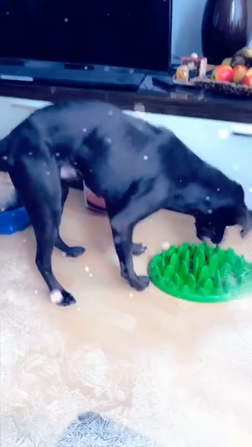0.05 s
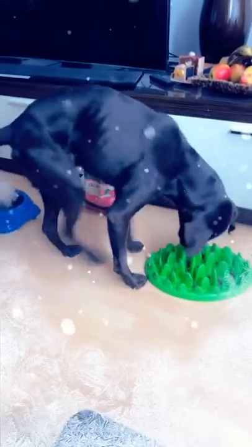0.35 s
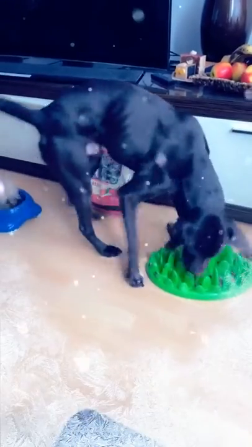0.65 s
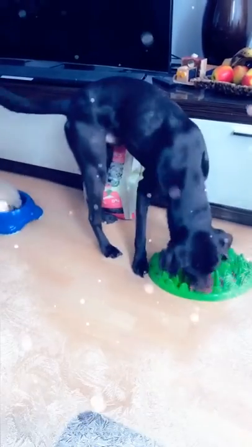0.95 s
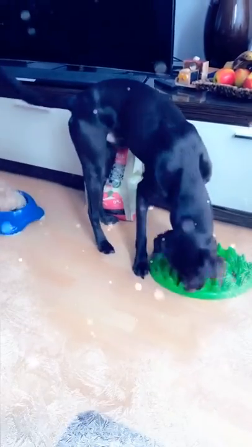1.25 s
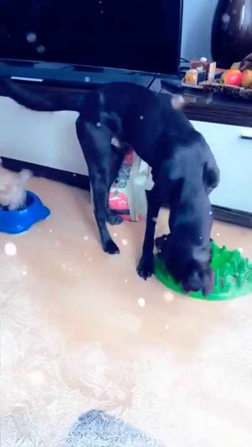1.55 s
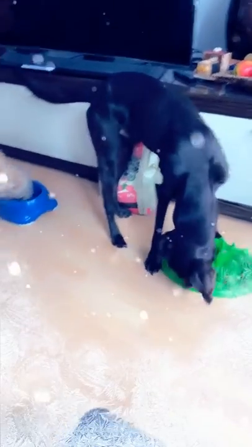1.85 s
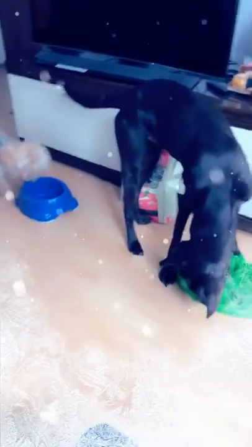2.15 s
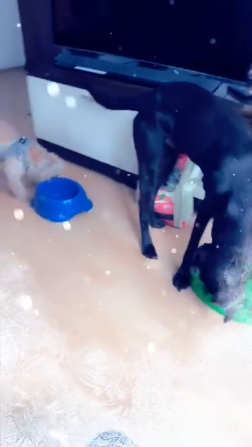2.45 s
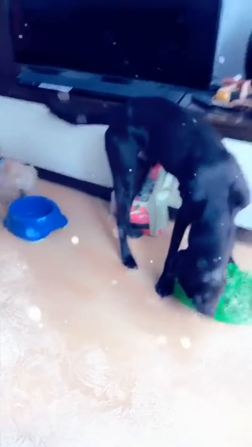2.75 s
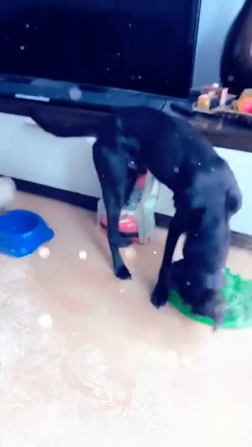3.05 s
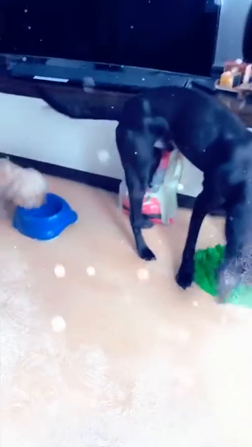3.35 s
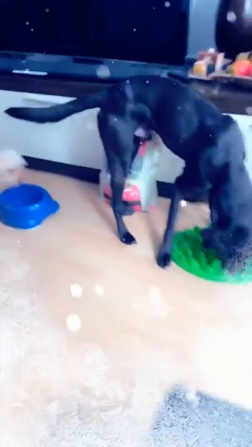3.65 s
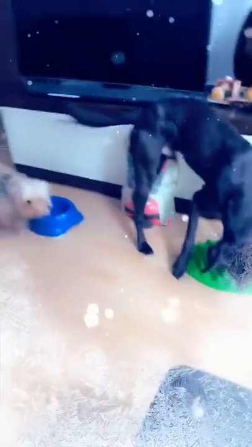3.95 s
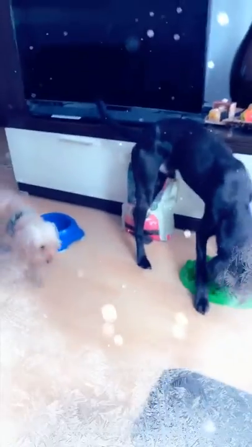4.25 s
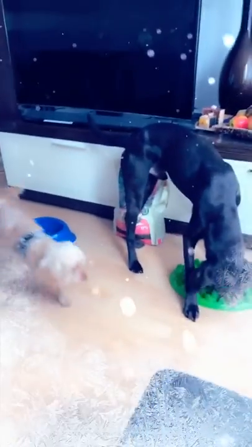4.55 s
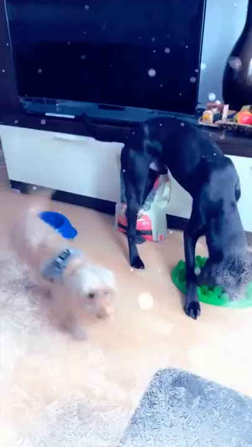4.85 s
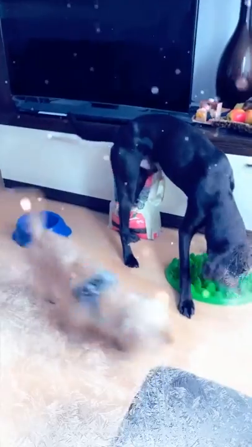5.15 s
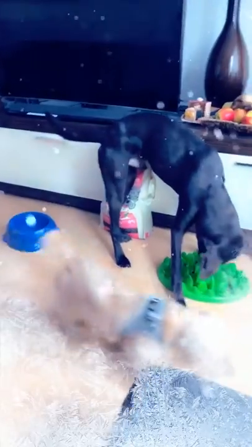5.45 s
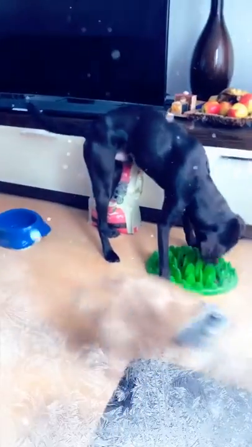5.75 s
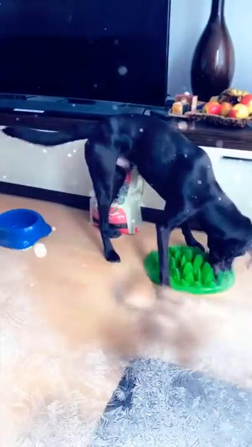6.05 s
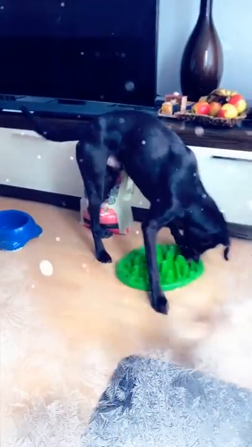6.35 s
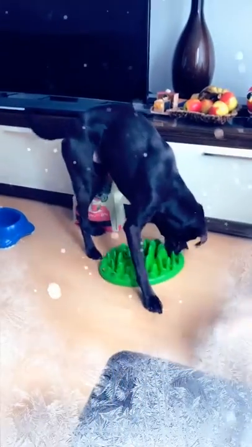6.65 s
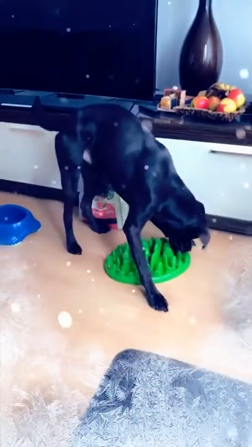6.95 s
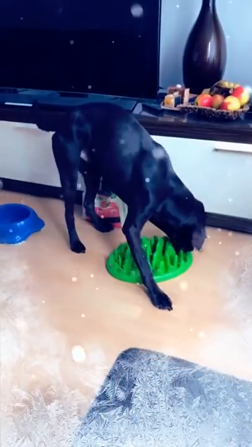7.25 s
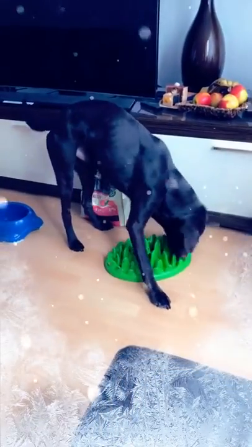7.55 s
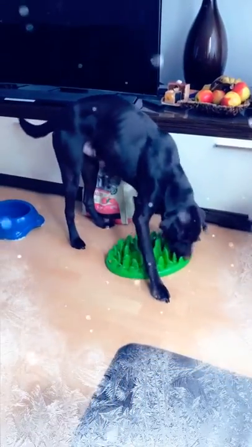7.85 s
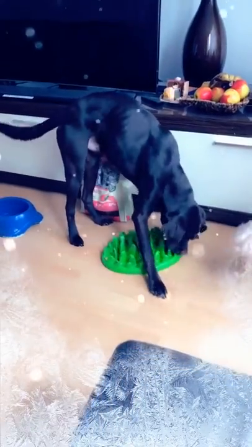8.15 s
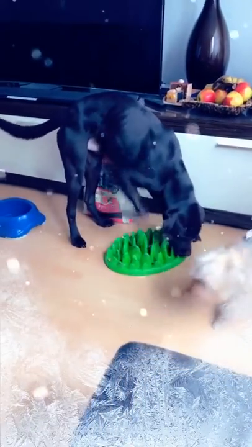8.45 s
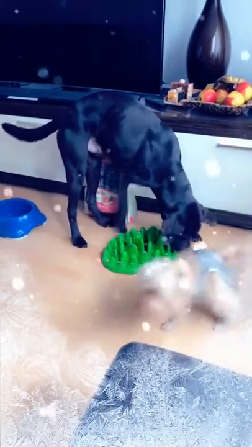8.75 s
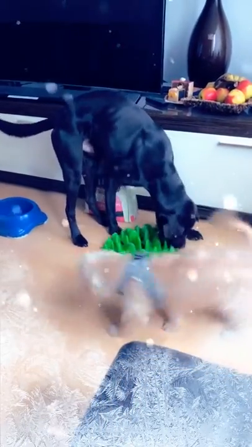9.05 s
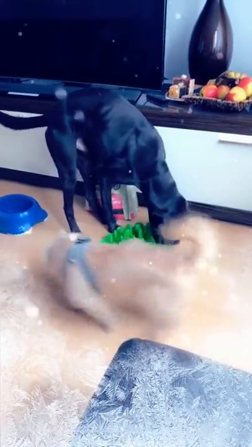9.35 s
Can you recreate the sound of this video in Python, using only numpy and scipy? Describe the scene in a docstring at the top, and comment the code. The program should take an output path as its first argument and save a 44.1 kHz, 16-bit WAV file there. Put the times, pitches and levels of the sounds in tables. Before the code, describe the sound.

Crisp crunches open as a dog chews kibble, followed by a quick, uneven chatter of snout and pellets against a plastic feeder bowl. Sparser knocks and cracks give way to a quieter moment of licking and soft paw bumps, before the clatter comes back louder and ends on a crunch. The microphone is in the same slightly echoing room, catching faint coat rustle and low floor rumble.

```python
"""A dog roots for kibble in a spiked plastic slow-feeder bowl on the floor of a hard, ringing room.
Pellets crack between its teeth first; from 1 to 3 s snout and pellets chatter on the spikes.
Sparser knocks and cracks follow, then a lull of wet smacks and soft bumps from 5 to 6 s.
The knocks return, peak near 7.3 s and stay busy until a last crack at 9.6 s.
Throughout, crumbs shuffle, the coat rustles and the floor booms softly under the dog's weight."""
import sys
import numpy as np
from scipy import signal
from scipy.fft import rfft, irfft, next_fast_len
from scipy.io import wavfile
from scipy.ndimage import uniform_filter1d

SR = 44100
rng = np.random.default_rng(int(sys.argv[2]) if len(sys.argv) > 2 else 0)


def wrap_up_sound(samples):
    """Save the sound to the file named by the first command line argument, as 16-bit audio."""
    columns = np.atleast_2d(samples).T
    # keep every value between -1 and 1, then stretch to whole-number steps
    tamed = np.clip(columns, -1, 1)
    steps = np.round(tamed * 32767).astype(np.int16)
    wavfile.write(sys.argv[1], SR, steps)


N = 424241
HIT_SAMPLES, TOP_HZ = 20480, 15800
AGE_S, TIME_S = np.arange(HIT_SAMPLES) / SR, np.arange(N) / SR
PEAK_S = .03  # peak of a contact flurry, from its start


# snout shoves, thud to clack relative to level:
# (time [s], level [dB], thud [dB], clatter [dB], edge [dB], clack [dB], spike pitch [Hz])
KNOCKS = [(0.004, -50.5, -7, -0.5, -10, -31, 696), (0.874, -43.5, 2, -2.5, 5.5, -24, 507),
          (1.059, -23, -7, 0, -7.5, -12, 694), (1.15, -34.5, -8, -7, -8.0, -18, 480),
          (1.226, -52, 0.0, 12, 6, -20, 640), (1.392, -47.5, 6.5, -4.5, -6, -23, 414),
          (1.466, -64, -4, 1.5, 11.5, 1, 2520), (1.573, -57, 9, -8.5, -16.5, -13, 378),
          (1.623, -46, -6.0, -13, -14, -13, 520), (1.669, -28, -11.5, -14, -15.5, -34, 744),
          (1.733, -39.5, -0.5, -4, -5.5, -6.5, 587), (1.926, -31, -11, -11.5, -16, -30, 702),
          (1.984, -25.5, -5.5, -6, -7.5, -19, 383), (2.037, -35, -14, -5, -17, -8, 528),
          (2.229, -33.5, -14, -16, -14.5, -26, 650), (2.283, -34, 1.5, -11, -2, -7.5, 406),
          (2.322, -47.5, -12, 7.5, 5, -23, 1880), (2.436, -46.5, 2.5, -10, -10, -21, 527),
          (2.539, -36.5, -6, -5, 2.5, -12, 704), (2.58, -25.5, -5, -0.5, -0.5, -18, 516),
          (2.625, -34.0, 0, 0.5, -24, -32, 646), (2.69, -49.5, 2, 6, 16, -1, 2095),
          (2.813, -58.5, -4.5, 1, 12.5, 1.5, 2034), (2.888, -30, -6.5, -8, -18, -25.5, 639),
          (2.983, -42, -9, -11, -13.0, -37, 543), (3.09, -55, -0.5, -14, -6.5, -12, 2760),
          (3.52, -57.5, -5, -9, -11, -9, 920), (3.656, -30.5, -1.5, -7, -13.5, -21.5, 815),
          (3.712, -34.0, -11, -9.5, -19, -28.0, 743), (3.922, -37, 0, -6, -8.0, -17, 700),
          (4.047, -38, -0.5, -34, -7, -20, 360), (4.472, -45.5, 5.5, 7.5, -2, -11.5, 383),
          (4.738, -34, -1.5, -10, -11, -16.5, 816), (4.802, -37.5, -6, -13.5, -13, -30, 520),
          (5.004, -30, -18, -8, -9.5, -5.5, 830), (5.028, -32.5, -1.5, 0.5, -1, -7.5, 1216),
          (5.296, -81.5, 14, 11, 26, 17, 2350), (5.397, -49, -12, -4.5, -16, -14, 1012),
          (5.462, -65, 6, -4, 3, -13, 404), (6.07, -74, -2.0, 17, 9, 5, 1770),
          (6.25, -36, -7, -6, -3, -11, 700), (6.313, -42, -6, -2.5, -6.5, -17.0, 365),
          (6.427, -43.5, -2.5, -20, -6, -21, 522), (6.528, -37.5, -2, -19, -9, -18, 618),
          (6.6, -32.5, -8.5, -3, -16, -19, 585), (6.909, -31.5, -11.5, -1.5, -9.5, -19.5, 820),
          (6.989, -49, 8, 5.5, 3, -18, 1630), (7.252, -21.5, -12, -1, -2.5, -8.5, 670),
          (7.297, -24.5, -18, 3, -4.5, -15.0, 807), (7.677, -54, -22, -7.0, 2, -2, 548),
          (8.023, -50, -5, -4, -2, -8, 373), (8.083, -25, -9, -2.0, -7.0, -12.5, 498),
          (8.107, -26.5, -22, 3, -7.5, -17, 1070), (8.141, -34.5, -12, 2, -4, -16.0, 1075),
          (8.29, -52.5, 5, 5.5, 6.5, -4.5, 1360), (8.61, -27, -10, 1, -9, -14.5, 772),
          (8.815, -34.5, -39, 5, -5.5, -29, 795), (8.937, -44.5, -8, 3.5, 0.5, 5, 1540),
          (9.026, -44, 1, -3, -2, -11, 600), (9.158, -36, -1.5, -1, 0, -13, 471),
          (9.219, -37.5, -10, -4, -9, -28, 524), (9.397, -26.5, -9, -2.5, -15, -19.5, 657),
          (9.429, -28.5, -10, -6.5, -16, -37, 530), (9.475, -37, -19, -12, -13, -42, 680)]
# ring, thud, clatter, edge, clack, pellet tick, floor thump: (low [Hz], high [Hz])
KNOCK_BANDS = [(480, 1000), (210, 480), (1000, 2000), (2000, 3000), (3000, 4200), (5600, 15000), (100, 200)]

def knocks(rise_s=.0105, fall_s=.0097, lag_s=.0025):
    """Each shove chatters on the spikes: the bowl rings, the floor thumps, pellets tick and hop."""
    out = np.zeros(N)
    tails = [room_tail() for _ in range(8)]
    for k, (time_s, level_db, thud, clatter, edge, clack, pitch_hz) in enumerate(KNOCKS):
        rattle = hops()
        push = contacts(rise_s, fall_s, spread_db=2.5, size=len(rattle))
        ring = sum(signal.fftconvolve(force, bowl_ring(pitch_hz))[:len(push)]
                   for force in (push, rattle))
        tick = resonances(colour(push + rattle, PELLET_SPECTRUM), scatter_db=6, count=140)
        parts = band_pass([ring] * 5 + [tick, push], KNOCK_BANDS)
        bands_db = np.array([-2, thud - 1.5, clatter - 3, edge - 3, clack - 3, clack - 20, thud - 18])
        hit = in_room(parts, level_db + bands_db, tails[k % len(tails)], room_db=-7)
        add(out, hit, time_s + lag_s - PEAK_S)
    return out


# modes of bowl and spikes: (frequency [Hz], width [Hz], level [dB])
BOWL_MODES = [(224.8, 57, -5), (354.7, 46, 0.5), (539.7, 41.4, 1.5), (657, 45, 3), (759, 46, 3),
              (985, 32, -11.5), (1093.7, 27, 1.5), (1230, 49, -5.5), (1408, 47, 1), (1686, 41, 1),
              (2018, 154, -6), (2410, 130, -8), (2766, 90, -10.5), (3150, 160, -18), (3410, 92, -17)]

def bowl_ring(pitch_hz, spike_width_hz=45, spike_db=3.5, scatter_db=.5, size=4096):
    """One tap excites the bowl's damped modes and the note of the struck spike."""
    modes = list(BOWL_MODES) + [(pitch_hz, spike_width_hz, spike_db)]
    hz, width_hz, db = np.transpose(modes)[:, :, None]
    weight = undb(db + scatter_db * rng.standard_normal(hz.shape)) * width_hz
    hz = hz * (1 + .04 * rng.standard_normal(hz.shape))  # the pressing snout detunes the plastic
    phase = 2 * np.pi * rng.random(hz.shape)
    decay = np.exp(-np.pi * width_hz * AGE_S[:size])
    return np.sum(weight * decay * np.sin(2 * np.pi * hz * AGE_S[:size] + phase), axis=0)


def hops(mean_gap_s=.032, start_db=-10, loss_db_per_s=125, uneven_db=2, count=5, size=10240):
    """Loose pellets drop back on the plastic in uneven, fading taps."""
    out, after_s = np.zeros(size), 0
    for gap, strength in zip(rng.uniform(.6, 1.4, count), rng.uniform(-1, 1, count)):
        after_s += gap * mean_gap_s
        tap = contacts(rise_s=.005, fall_s=.0078, spread_db=1)
        add(out, tap * undb(start_db - loss_db_per_s * after_s + uneven_db * strength), after_s)
    return out


# kibble cracks, tooth and claw clicks, snap and fizz relative to level:
# (time [s], level [dB], snap [dB], fizz [dB], ring pitch [Hz])
CRACKS = [(0.46, -60.5, 7.5, -10, 6540), (0.54, -57.5, 8, -18, 6140), (0.617, -27.5, -3.5, -8, 8100),
          (0.634, -33, -3, -12, 7450), (0.8025, -44.5, -0.5, -8, 8250), (0.855, -42.5, -2, -15, 7900),
          (0.894, -41.5, -5, -6.5, 8800), (1.2, -47, -11, -17, 6860), (1.668, -67, -7, 0, 7000),
          (1.735, -76, 0.0, 12, 8400), (1.984, -61.5, 0.0, -7, 8700), (2.036, -80.5, 0.0, 20, 8500),
          (2.284, -58, 15, 0, 7600), (2.436, -61.5, 2, -17, 6960), (2.536, -44.5, -8, -14, 6940),
          (2.578, -47, 7, -15, 7060), (2.688, -56, -10, -22, 6700), (3.582, -60, -4, -13, 6600),
          (3.934, -52.5, -9, -20, 7200), (4.082, -55.5, 4.5, -25, 7300), (4.174, -63, -9, -10, 7400),
          (4.232, -33.5, -3, -0.5, 8050), (4.268, -40.5, -3, -15, 6400), (4.337, -48, 3, -13.5, 6900),
          (4.603, -55.5, 11, -15, 6440), (5.02, -72.5, -0.5, -2, 7080), (6.25, -60.5, -1.5, -15.5, 7220),
          (6.527, -58, 2, -23.0, 7450), (6.6, -63, 0.0, -3, 7400), (6.837, -50, -21, -11, 7600),
          (7.25, -39.5, 3, -14, 6260), (7.857, -59.5, 4.5, 2.5, 9100), (8.358, -58, -3.0, -7, 7760),
          (8.809, -34, -30, -34, 7000), (8.84, -53, 9, -25.0, 6330), (9.159, -59, 1, -12, 8500),
          (9.603, -43, 5.5, -5, 8000)]
# ring, body, snap, crunch, fizz: (low [Hz], high [Hz])
CRACK_BANDS = [(5900, 9200), (500, 2000), (2000, 3700), (3600, 5600), (11000, 15800)]
# brittle pellet: (frequency [Hz], level [dB])
PELLET_SPECTRUM = [(500, -6), (780, 7.5), (1000, -15), (2000, 3.5), (2600, 9), (3080, 14), (3700, 1),
                   (5800, -6), (7200, 0.5), (7750, -6.5), (8200, -2.5), (9000, -5.5), (10000, -12),
                   (11400, -11), (15500, -32)]

def cracks(rise_s=.009, fall_s=.008, lag_s=.0051, ring_db=4):
    """A pellet breaks in a quick run of rough, bright fractures that ring briefly."""
    out = np.zeros(N)
    tails = [room_tail() for _ in range(6)]
    for k, (time_s, level_db, snap, fizz, pitch_hz) in enumerate(CRACKS):
        fractures = colour(contacts(rise_s, fall_s, spread_db=2.5), PELLET_SPECTRUM)
        burst = resonances(clumped(fractures, depth_db=3), scatter_db=4, count=150)
        ring = colour(burst, [(pitch_hz / 1.12, 0), (pitch_hz, ring_db), (pitch_hz * 1.12, 0)])
        parts = band_pass([ring] + [burst] * 4, CRACK_BANDS)
        bands_db = np.array([-1, snap - 9, snap - 6.5, snap / 2 - 7.5, fizz - 2])
        hit = in_room(parts, level_db + bands_db, tails[k % len(tails)], room_db=-5)
        add(out, hit, time_s + lag_s - PEAK_S)
    return out


# paw and muzzle blows: (time [s], level [dB], pitch [Hz])
BUMPS = [(3.308, -32.5, 500), (4.161, -35.5, 114), (4.193, -49.5, 205), (5.668, -50.5, 295),
         (5.707, -55.5, 380), (5.957, -54.5, 394), (6.316, -40.5, 169), (6.735, -42, 328),
         (5.876, -55.5, 125), (5.912, -48.5, 320), (7.002, -35, 319)]

def bumps(lag_s=.0019, gain_db=-5):
    """Soft flesh damps a blow to one hollow note of a few cycles."""
    out, tail = np.zeros(N), room_tail()
    for time_s, level_db, hz in BUMPS:
        hollow = [(hz / 4, -28), (hz / 1.5, -14), (hz, 0),
                  (hz * 1.45, 0), (hz * 2.1, -18), (hz * 10, -72)]
        note = colour(contacts(rise_s=1.2 / hz, fall_s=2.6 / hz, spread_db=2), hollow)
        hit = in_room([note], [level_db + gain_db], tail, room_db=-15)
        add(out, hit, time_s + lag_s - PEAK_S)
    return out


# lip and tongue smacks: (time [s], level [dB], relative click [dB], squeak pitch [Hz])
SMACKS = [(1.05, -63, -2, 12900), (8.835, -61.5, -2.5, 13600), (9.165, -66, 2, 13000),
          (2.632, -60, -13.5, 13200), (4.97, -70.5, 5, 12200), (5.233, -64.5, -7.5, 13000),
          (5.497, -54, -10, 12800), (5.752, -75, -17.5, 13500), (5.838, -64.5, -5.5, 13700),
          (6.1465, -69, 0, 13000), (6.2, -66, -2, 12600), (8.194, -62.5, 1.5, 12400),
          (8.245, -65, -18, 13500), (8.275, -58.5, -7, 13500), (8.5, -73, -1, 12400),
          (8.78, -69, -22, 13600), (9.21, -68, -4, 13300), (9.35, -73, -13, 12900)]
# squeak, click: (low [Hz], high [Hz])
SMACK_BANDS = [(11200, 15800), (5900, 9200)]

def smacks(rise_s=.015, fall_s=.016, lag_s=.005, squeak_db=12, gain_db=-1):
    """Wet lips part in a scratchy cluster of tiny bursting films."""
    out, tail = np.zeros(N), room_tail()
    for time_s, level_db, click_db, pitch_hz in SMACKS:
        films = resonances(contacts(rise_s, fall_s, spread_db=4), scatter_db=6, count=160)
        films = colour(films, [(pitch_hz / 1.08, 0), (pitch_hz, squeak_db), (pitch_hz * 1.08, 0)])
        parts = band_pass([films, films], SMACK_BANDS)
        hit = in_room(parts, level_db + gain_db + np.array([0, click_db]), tail, room_db=-5)
        add(out, hit, time_s + lag_s - PEAK_S)
    return out


# tongue pushing crumbs: (time [s], level [dB])
CRUMB_LEVELS = [(0.0, -51), (0.22, -88), (0.75, -69), (1.2, -38.5), (1.4, -58), (1.9, -48.5), (2.3, -59),
                (3.2, -58), (3.7, -58), (4.15, -47.5), (4.6, -57.5), (5.3, -55.5), (5.55, -68.5),
                (6.0, -70), (6.2, -51), (7.2, -48.5), (7.55, -65.5), (7.8, -57.5), (8.55, -55.5),
                (9.25, -43.5), (9.62, -48.5)]
# licking and shuffling: (frequency [Hz], level [dB])
CRUMB_SPECTRUM = [(100, 2), (220, 8.5), (360, 6), (600, 11.5), (950, -4), (1700, 8), (2800, 1.5),
                  (3600, -14.5), (5000, -26.5), (7000, -14), (9000, -36), (10200, -54.5), (13000, -31.5)]

def crumbs(gain_db=-3.5, room_db=-7, loose_db=-21, settle_s=.03):
    """Tongue and crumbs patter in the pauses; every knock sets loose pellets rattling."""
    patter = colour(grains(rate_per_s=32, spread_db=13, ring_s=.008), CRUMB_SPECTRUM)
    echoes = undb(room_db) * signal.fftconvolve(patter, room_tail())[:N]
    shuffle = clumped(patter + echoes, depth_db=5, size=768)
    knocks_db = np.array(KNOCKS)[:, 1] + loose_db
    envelope = knock_envelope(CRUMB_LEVELS, knocks_db, np.exp(-AGE_S / settle_s))
    return unit(shuffle) * envelope * undb(gain_db)


# dog's weight working the floor: (time [s], level [dB])
BOOM_LEVELS = [(0.0, -62), (0.4, -66), (0.48, -89), (0.75, -41), (0.94, -58), (1.12, -32), (1.58, -56),
               (2.06, -41), (2.14, -66), (2.3, -45.5), (2.87, -41.5), (3.02, -32), (3.51, -58.5),
               (3.94, -48.5), (4.02, -36.5), (4.15, -43.5), (4.85, -39), (5.52, -81), (5.87, -49.5),
               (6.51, -56.5), (6.59, -43), (7.23, -52), (7.29, -33.5), (7.77, -66.5), (7.88, -42.5),
               (8.63, -53), (8.65, -39.5), (8.87, -63), (8.97, -35), (9.05, -50.5), (9.54, -31),
               (9.62, -54)]
# floor resonance: (frequency [Hz], level [dB])
FLOOR_SPECTRUM = [(20, -11), (32, -11.5), (41, -19), (46, 1.5), (51, 1.5), (59, -5.5), (80, -12.5),
                  (110, -38), (170, -33), (300, -51), (600, -85)]

def floor_boom(gain_db=-1, even_s=.19, shove_db=-15, swell_s=.045):
    """The floor's lowest resonance follows the dog's weight and swells after each shove."""
    rumble = colour(rng.standard_normal(N), FLOOR_SPECTRUM)
    rumble /= np.sqrt(uniform_filter1d(rumble ** 2, int(even_s * SR)))
    _, level_db, thud_db, *_ = np.transpose(KNOCKS)
    swell = AGE_S / swell_s * np.exp(1 - AGE_S / swell_s)
    return rumble * knock_envelope(BOOM_LEVELS, level_db + thud_db + shove_db, swell) * undb(gain_db)


# coat and paws: (frequency [Hz], level [dB])
RUSTLE_SPECTRUM = [(300, -22), (1000, 5), (2000, 2), (3100, 3.5), (4300, -20), (5300, -26.5), (7000, -19),
                   (9000, -10.5), (10200, -27.5), (13500, -19.5), (15500, -31.5)]

def rustle(level_db=-71):
    """Coat and paws never keep quite still."""
    patter = clumped(grains(rate_per_s=26, spread_db=8, ring_s=.018), depth_db=5, size=768)
    return unit(colour(patter, RUSTLE_SPECTRUM)) * undb(level_db)


# still room air: (frequency [Hz], level [dB])
AIR_SPECTRUM = [(59, -26.5), (100, 6), (153, -15.5), (214, -5), (300, -11.5), (519, -5), (879, -22.5),
                (1130, -14.5), (2420, -14.5), (3930, -30.5), (8410, -24), (9740, -41), (10800, -49),
                (15500, -55.5)]

def air(level_db=-73):
    """Faint steady room hiss."""
    return unit(colour(rng.standard_normal(N), AIR_SPECTRUM)) * undb(level_db)


# room decay: (frequency [Hz], T60 [s])
ROOM_DECAY = [(150, 0.57), (700, 0.4), (1800, 0.4), (5000, 0.4), (13000, 0.19)]

def room_tail(build_s=.0035):
    """Wall echoes of unit energy build up, then die, treble first."""
    hz, t60s_s = np.transpose(ROOM_DECAY)
    log_hz = np.log(np.fft.rfftfreq(HIT_SAMPLES, 1 / SR) + 1)
    spectrum = rfft(resonances(rng.standard_normal(HIT_SAMPLES), scatter_db=2, count=170))
    tail = np.zeros(HIT_SAMPLES)
    for share, t60_s in zip(np.eye(len(hz)), t60s_s):
        band = irfft(spectrum * np.interp(log_hz, np.log(hz), share))
        tail += band * np.exp(-np.log(1000) * AGE_S / t60_s)
    tail *= 1 - np.exp(-(AGE_S / build_s) ** 2)
    return tail / np.linalg.norm(tail)


def in_room(parts, levels_db, tail, room_db):
    """Mix a hit's bands by peak level, fade in, add uneven echoes."""
    direct = sum(part * undb(db) / peak_rms(part) for part, db in zip(parts, levels_db))
    direct *= np.minimum(2 * AGE_S[:len(direct)] / PEAK_S, 1) ** 2
    echoes = clumped(signal.fftconvolve(direct, tail)[:HIT_SAMPLES], depth_db=4.2, size=768)
    return echoes * undb(room_db) + np.pad(direct, (0, HIT_SAMPLES - len(direct)))


def contacts(rise_s, fall_s, spread_db, size=4096):
    """A flurry of tiny uneven impacts swells until PEAK_S, then decays."""
    from_peak_s = AGE_S[:size] - PEAK_S
    swell = np.exp(np.where(from_peak_s < 0, -(from_peak_s / rise_s) ** 2, -from_peak_s / fall_s))
    strengths = undb(spread_db * np.repeat(rng.standard_normal(size // 32), 32))
    return swell * strengths * rng.standard_normal(size)


def grains(rate_per_s, spread_db, ring_s):
    """Random patter of soft crunches, each with its own resonances."""
    out = np.zeros(N)
    for position, strength in rng.random((int(rate_per_s * N / SR), 2)):
        crunch = resonances(contacts(ring_s, ring_s, spread_db=0), scatter_db=7.5, count=120)
        add(out, undb(spread_db * strength ** 2) * unit(crunch), position * N / SR - PEAK_S)
    return out


def resonances(x, scatter_db, count):
    """Random narrow resonances, as each pellet and each spot in the room has."""
    hz = np.linspace(np.sqrt(200), np.sqrt(TOP_HZ), count) ** 2
    return colour(x, np.transpose([hz, scatter_db * rng.standard_normal(count)]))


def clumped(x, depth_db, size=512):
    """Patches a few hundred Hz wide and some 20 ms long swell and fade independently."""
    cells = signal.stft(x, nperseg=size)[2]
    patches = rng.standard_normal(cells.shape)
    for _ in range(2):
        patches = uniform_filter1d(uniform_filter1d(patches, size=3, axis=0), size=3, axis=1)
    gain = unit(undb(depth_db * np.clip(unit(patches), -2, 2)))
    return signal.istft(cells * gain, nperseg=size)[1][:len(x)]


def knock_envelope(levels, knocks_db, swell):
    """Gain from (time [s], level [dB]) rows plus one swell per knock, summed in power."""
    power = undb(np.interp(TIME_S, *np.transpose(levels))) ** 2
    for (time_s, *_), db in zip(KNOCKS, knocks_db):
        add(power, (undb(db) * swell) ** 2, time_s)
    return np.sqrt(power)


def colour(x, spectrum):
    """Filter by (frequency [Hz], level [dB]) rows."""
    hz, db = np.transpose(spectrum)
    size = next_fast_len(len(x))
    log_hz = np.log(np.fft.rfftfreq(size, 1 / SR) + 1)
    gain = undb(np.interp(log_hz, np.log(hz), db))
    return irfft(rfft(x, size) * gain, size)[:len(x)]


def band_pass(sounds, bands_hz):
    """Filter each sound to its own band."""
    return [signal.sosfilt(signal.butter(4, edges_hz, "band", fs=SR, output="sos"), x)
            for x, edges_hz in zip(sounds, bands_hz)]


def add(track, sound, start_s):
    """Mix a sound into the track."""
    start = int(start_s * SR)
    part = sound[max(-start, 0):max(len(track) - start, 0)]
    track[max(start, 0):max(start, 0) + len(part)] += part


def peak_rms(x):
    """Rms of the loudest 8 ms."""
    return np.sqrt(uniform_filter1d(x ** 2, 350).max())


def unit(x):
    """Scale to rms 1."""
    return x / np.sqrt(np.mean(x ** 2))


def undb(db):
    """Decibels to gain."""
    return 10 ** (np.asarray(db) / 20)


def scene():
    """Mono sum of all sources."""
    return (knocks() + cracks() + smacks() + bumps() + crumbs() + rustle() + floor_boom() + air())[None]


def record(dry):
    """Steep low-pass at TOP_HZ."""
    return signal.sosfilt(signal.ellip(10, .2, 70, TOP_HZ, fs=SR, output="sos"), dry)


dry = scene()
out = record(dry)
wrap_up_sound(out)
```